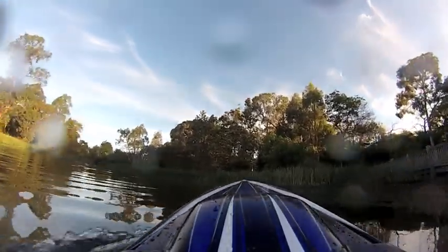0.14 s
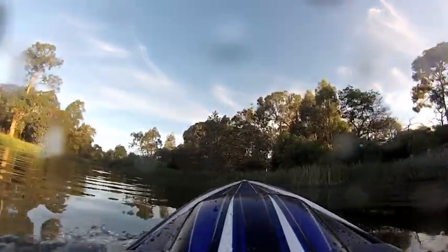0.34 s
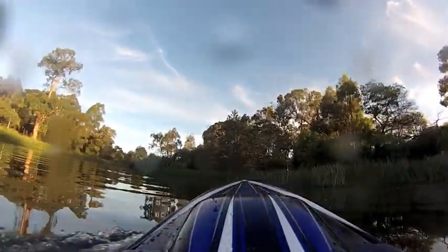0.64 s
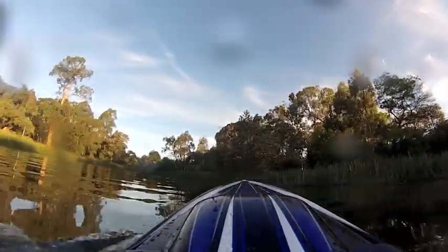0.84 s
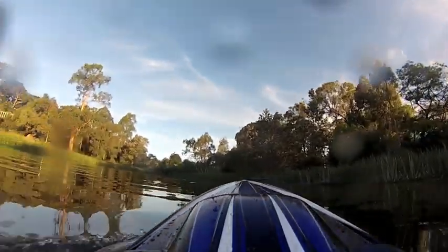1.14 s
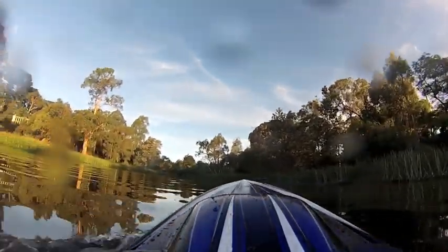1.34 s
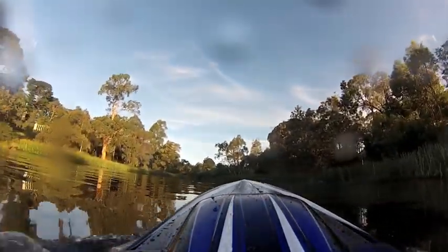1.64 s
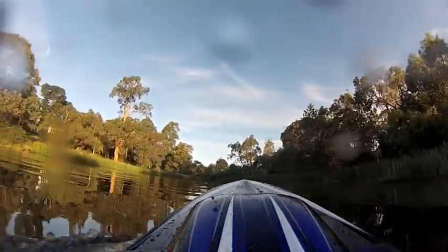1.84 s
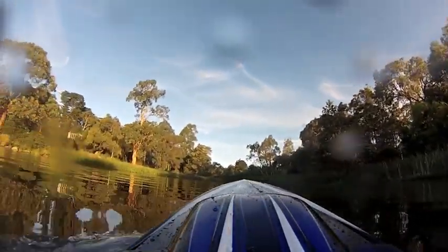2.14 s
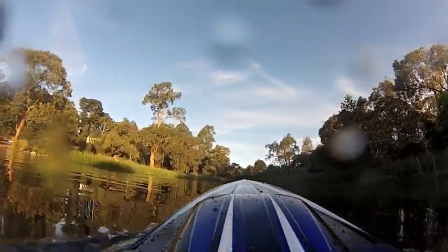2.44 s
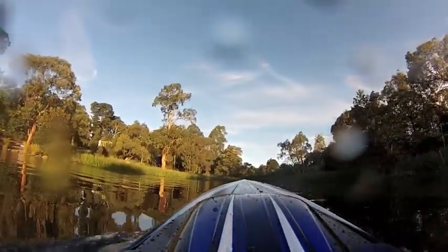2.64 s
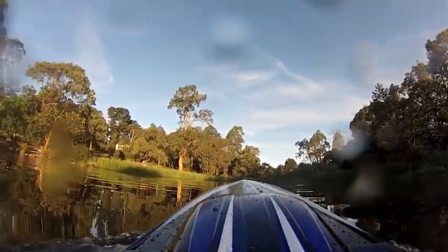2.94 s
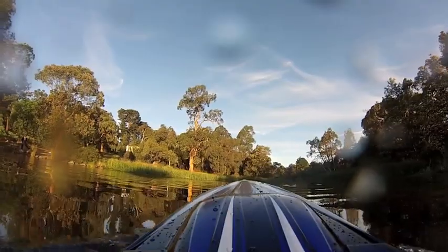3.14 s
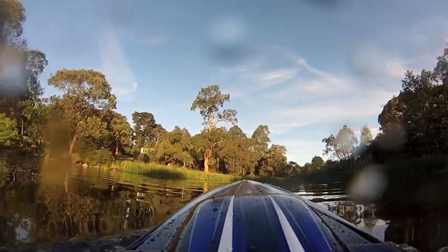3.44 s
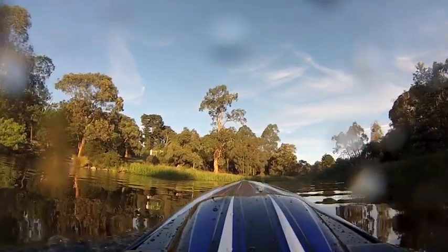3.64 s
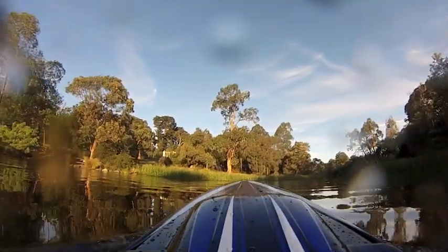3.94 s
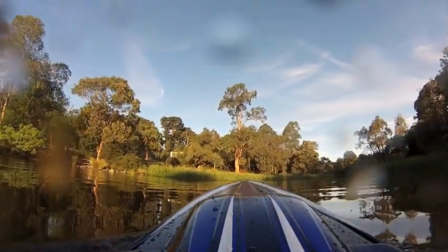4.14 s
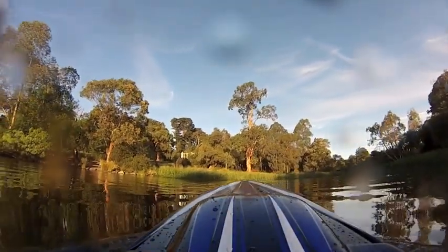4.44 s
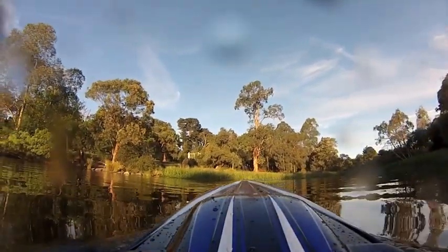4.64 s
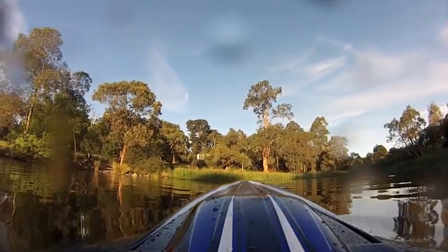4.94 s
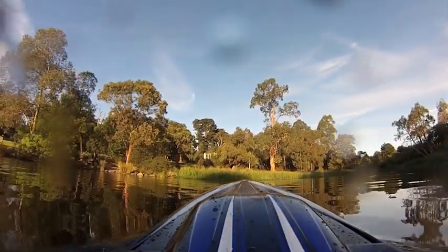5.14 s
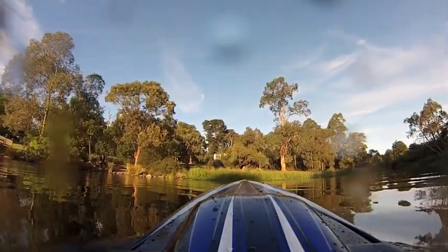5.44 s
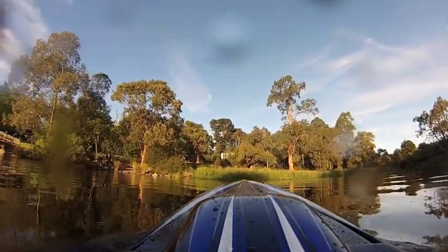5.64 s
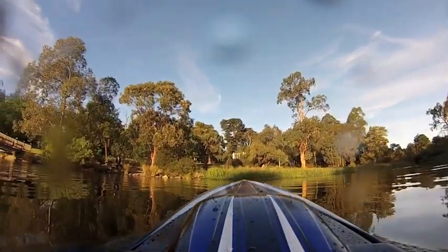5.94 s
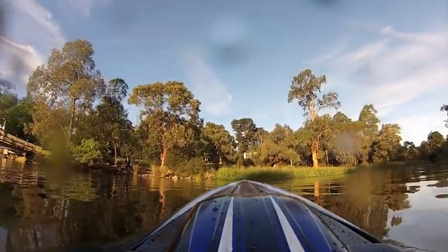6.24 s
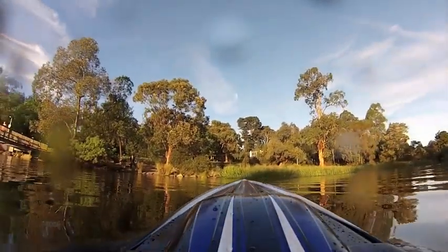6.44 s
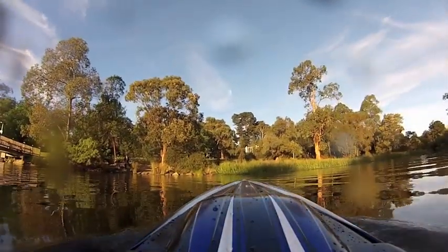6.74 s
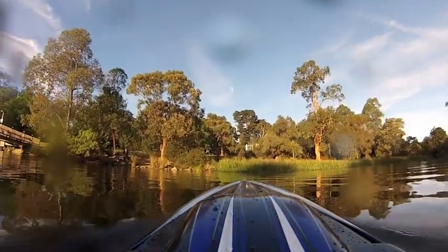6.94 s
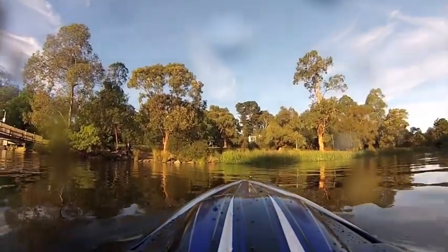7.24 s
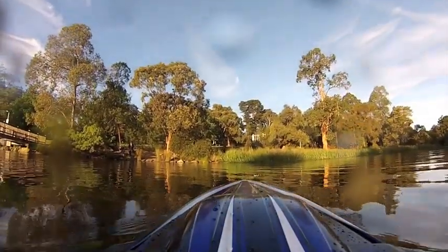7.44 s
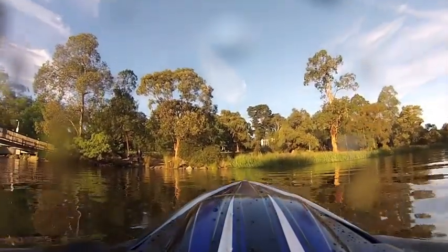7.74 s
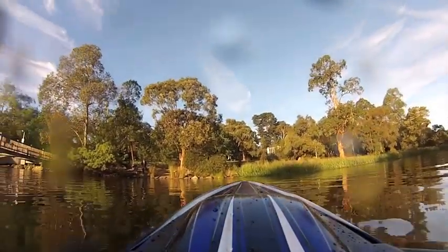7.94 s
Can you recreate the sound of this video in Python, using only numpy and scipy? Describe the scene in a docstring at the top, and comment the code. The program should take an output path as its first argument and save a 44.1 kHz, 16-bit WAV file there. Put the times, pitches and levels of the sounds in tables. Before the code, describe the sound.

Heard from on board, a model boat's whining motor gradually slows, stops briefly amid soft gurgling water, then slaps the water and races.

```python
"""On a lake, on the deck of an electric model boat, heard from a camera that rides on it.
The propeller drones through the hollow hull while the drive shaft rattles and water rushes and sprays.
The throttle closes: the boat coasts among lapping wavelets and plopping bubbles, and the motor blips.
Then it restarts with a thin whine and a slap of water; the propeller bites, draws air and races."""
import sys
import numpy as np
from scipy import signal
from scipy.fft import rfft, irfft
from scipy.io import wavfile

SR = 44100
rng = np.random.default_rng(int(sys.argv[2]) if len(sys.argv) > 2 else 0)


def pcm_store(signal):
    """Save signal as 16-bit PCM."""
    levels = np.round(np.clip(np.atleast_2d(signal), -1, 1) * 32767)
    wavfile.write(sys.argv[1], SR, levels.astype(np.int16).T)


N = 356769
T = np.arange(N) / SR
CLOSE_S, OPEN_S, RUNDOWN_S = 6.3, 7.752, 0.34  # throttle shut, throttle open, length of the run-down
CRUISE_HZ, FULL_HZ, IDLE_HZ = 128, 177, 112  # blade rates


def drive():
    """The boat under power: propeller tones, rattle and water, all riding on one turning shaft."""
    blade_hz = blade_rate()
    turn = angle(blade_hz * (1 + 0.001975 * wander(14.37)))
    slip_db, *water_churn_db = churn()
    rush_db, clatter_db, spray_db, boom_db = water_levels(blade_hz, *water_churn_db)
    propeller = drone(turn, blade_hz, slip_db) + whine(turn, blade_hz, rush_db)
    return propeller + water(turn, blade_hz, rush_db, clatter_db, spray_db, boom_db)


# How loud the hull makes a propeller tone at each pitch: (pitch [Hz], level [dB])
DRONE_RESPONSE = [(115, -37), (136, -39.5), (155, -30), (170, -23.5), (184, -16.5), (203, -22), (230, -18),
                  (252, -14), (272, -13.5), (302, -23), (335, -28), (370, -37.5), (405, -32.5)]
def drone(turn, blade_hz, slip_db):
    """Blade tone and octave waver as the blades bite; pulling away, the tone swells and the octave dips."""
    tone_hz, tone_db = np.transpose(DRONE_RESPONSE)
    grip_db = slip_db + throttle(fall_db=54, hang=0.84, lag_s=0.017)
    pull = arch(7.85, width_s=0.11)
    blade_db = np.interp(blade_hz, tone_hz, tone_db) + grip_db + 17.5 * pull
    octave_db = np.interp(2 * blade_hz, tone_hz, tone_db) + grip_db - 9 * pull ** 2
    blade = gain_of(blade_db + 0.38 * wander(34)) * np.sin(turn + 0.085 * wander(30))
    octave = gain_of(octave_db + 0.72 * wander(16)) * np.sin(2 * turn + 0.08 * wander(30))
    return np.sqrt(2) * (blade + octave)


# Drive overtones before the hull colours them: (pitch [x blade rate], level [dB])
OVERTONES = [(.5, -5.5), (1.5, -6.5), (2.5, -11), (3, 2), (4, 2), (5, -2.5), (6, -2), (7, -9.5), (8, -4),
             (11, 2), (12, 1)]
# Bearing whine between the harmonics: (pitch [x blade rate], level [dB])
BEARINGS = [(8.78, 2), (9.27, -3)]
# The whine stands out of the rush most at full speed: (blade rate [Hz], trim [dB])
WHINE_TRIM = [(130, 1.5), (165, -2), (180, 2.5)]
def whine(turn, blade_hz, rush_db):
    """Drive and bearing overtones swell as they sweep across the hull's resonances."""
    response = hull_gain(np.arange(SR // 8))
    partials = np.zeros(N)
    for multiple, db in OVERTONES + BEARINGS:
        resonance = np.interp(multiple * blade_hz, np.arange(len(response)), response)
        phase = multiple * turn + 2 * np.pi * rng.random() + 0.45 * wander(11)
        partials += gain_of(db) * resonance * np.sin(phase)
    trim_db = np.interp(blade_hz, *np.transpose(WHINE_TRIM))
    return np.sqrt(2) * gain_of(rush_db + trim_db + wander(12)) * partials


# The run, sagging as the boat digs into its turn: (time [s], blade rate [Hz])
RUN_SPEED = [(0.0, 199.8), (0.4, 203.2), (0.56, 177.1), (0.9, 187.7), (1.38, 186.7), (2.23, 177.3),
             (2.4, 166.5), (2.65, 169.5), (2.78, 158.3), (3.17, 152.5), (3.34, 141.1), (3.72, 140.5),
             (3.8, 132.9), (4.22, 129.5), (4.3, 122.8), (4.66, 116.2), (4.73, 132.2), (5.16, 136.4),
             (5.53, 134.2), (5.81, 125.4), (6.15, 123.8), (6.22, 136.1)]
# The restart, where the propeller bites, draws air and races: (time [s], blade rate [Hz])
LAUNCH_SPEED = [(7.76, 125.9), (7.83, 139.2), (7.945, 131), (7.97, 182.7), (8.0, 204.2), (8.025, 247.7),
                (8.05, 239.4), (8.08, 202.6)]
def blade_rate(sag_hz_per_s=250):
    """The drive's pitch curve in Hz: the run, a dive as the throttle closes, then the launch."""
    run_hz, = curves(RUN_SPEED)
    launch_hz, = curves(LAUNCH_SPEED)
    sag_hz = sag_hz_per_s * np.maximum(T - CLOSE_S, 0)
    return run_then_launch(np.maximum(run_hz - sag_hz, IDLE_HZ), launch_hz)


def throttle(fall_db, hang=1, lag_s=0, pickup_db_per_s=430):
    """Fader in dB: down fall_db after RUNDOWN_S (hang > 1 holds on longer), quickly up for the restart."""
    closing = fall_db * (np.maximum(T - CLOSE_S, 0) / RUNDOWN_S) ** hang
    opening = pickup_db_per_s * np.maximum(OPEN_S + lag_s - T, 0)
    return -np.minimum(closing, opening)


# Level moves as the propeller churns:
# (start [s], length [s], drone [dB], rush [dB], spray [dB], boom [dB])
CHURNS = [(0, .4, -4, 1.5, 0, -1), (1.98, 0.13, -4, 0, 0, -1), (4.318, .07, -3.5, 0, -1, 1.5),
          (5.586, 0.047, -3, -0.5, 0, 0.5), (6.222, .05, -19, 2.5, 4, 2), (6.295, .04, 0, 2.5, 1.5, 5),
          (6.45, 0.127, 5, -0.5, -2.5, 6.5), (7.746, 0.019, -4, 10, -7.5, -4), (7.762, .085, 3, -2, 11, 6),
          (7.957, 0.037, -4.5, 3, 12.5, 0), (8.034, .07, -5.5, 5, 17, 2.5)]
def churn():
    """The propeller churns up air and its grip changes: four curves of brief dips and surges in dB."""
    return sum(np.outer(changes_db, during(s, s + length_s, fade_s=0.016))
               for s, length_s, *changes_db in CHURNS)


# Water and rattle on the run: (time [s], flow level [dB], clatter offset [dB], spray offset [dB])
WATER_MIX = [(0.02, -22, -8.5, -21.5), (0.09, -24, -6, -23), (0.24, -25.5, -7.5, -22),
             (0.58, -25.5, -4, -21), (2.08, -24, -6.5, -21), (2.64, -24.5, -6, -20),
             (3.64, -26.5, -5.5, -18.5), (3.83, -28, -4.5, -21.5), (3.96, -27, -6, -19),
             (4.48, -29.5, -4, -25), (4.6, -26.5, -6, -28), (4.76, -30.5, -6, -20.5), (6.18, -28, -5, -22)]
def water_levels(blade_hz, surge_db, spit_db, thump_db):
    """Four faders follow the flow past the hull, which grows with the blade rate on the launch."""
    run_db, run_clatter_db, run_spray_db = curves(WATER_MIX)
    launch_db = -34.5 + 5.5 * np.log2(blade_hz / CRUISE_HZ)
    flow_db = run_then_launch(run_db, launch_db) + surge_db
    rush_db = flow_db + throttle(fall_db=33)
    clatter_db = flow_db + run_then_launch(run_clatter_db, -8.5) + throttle(fall_db=36)
    spray_db = flow_db + run_then_launch(run_spray_db, -31.5) + spit_db + throttle(fall_db=65)
    boom_db = flow_db + run_then_launch(2, 4) + thump_db + throttle(fall_db=23, hang=2.85)
    return rush_db, clatter_db, spray_db, boom_db


def water(turn, blade_hz, rush_db, clatter_db, spray_db, boom_db):
    """A dense rattle pulses with shaft and blades and rings the hull in three bands, with spray on top."""
    beat = gain_of(0.77 * np.sin(turn / 2) + 1.66 * np.sin(turn) + wander(44))
    rattle = unit_rms(beat * (rng.standard_normal(N) + 0.72 * ticks(per_s=2500, spread_db=2.5)))
    body = hull(rattle + gain_of(-17) * scrape(turn))
    boom = gain_of(boom_db) * unit_rms(band(body, 85, 467))
    rush = gain_of(rush_db - 2.5) * unit_rms(band(body, 445, 1380))
    clatter = gain_of(clatter_db) * unit_rms(band(body, 1572, 3795))
    return boom + rush + clatter + spray(rattle, blade_hz, spray_db)


def scrape(turn):
    """The shaft rubs the same rough spots on every revolution, slipping a little: a fine buzz."""
    shaft = turn / 2 + .012 * wander(25)
    return unit_rms(sum(np.sin(k * shaft + 2 * np.pi * rng.random()) for k in range(14, 60)))


def spray(rattle, blade_hz, spray_db):
    """Droplets patter on the case, in rougher spurts at low speed and on the launch."""
    uneven_db = run_then_launch(np.interp(blade_hz, [CRUISE_HZ, FULL_HZ], [3.5, 1]), 3.5)
    coarse = spatter(rattle, 0.84 * uneven_db, 4080, 6040) + spatter(rattle, uneven_db, 6080, 8170)
    mist = spatter(rattle, uneven_db, 8580, 15000)
    mist_db = 1 + .35 * (spray_db + 47)  # heavier spray throws more fine mist
    return gain_of(spray_db) * unit_rms(coarse + gain_of(mist_db) * mist)


def spatter(rattle, uneven_db, lo_hz, hi_hz):
    """Spray of one droplet size, arriving in spurts a few milliseconds long."""
    spurts = unit_rms(gain_of(uneven_db * (.95 * wander(130) + .35 * wander(20))))
    drops = 0.18 * uneven_db * ticks(per_s=360, spread_db=7.0)
    return band(hull(spurts * rattle + drops), lo_hz, hi_hz)


# Resonances of the hull and camera case: (centre [Hz], width [Hz], level [dB])
HULL_MODES = [(125.6, 21, -10.5), (182.8, 12.8, -1.5), (258.3, 26, 1.5), (396.3, 62, -10.5), (454, 14, -18),
              (599, 120, -19), (701.4, 62, -12.5), (839.6, 52, -10.5), (1167, 205, -14), (1306, 88, -15),
              (1422, 42, -20.5), (1676, 120, -27.5), (1931, 72, -22), (2150, 116, -22), (2355, 100, -20),
              (2843, 294, -27), (3016, 66, -28), (3534, 193, -24), (3940, 130, -33.5), (4764, 220, -35.5),
              (5350, 410, -34.5), (6780, 570, -43), (7700, 1700, -53), (11200, 1038, -53),
              (13671, 707, -60)]
def hull_gain(hz):
    """The hollow hull's tone colour: how strongly it passes each frequency."""
    return np.sqrt(sum(gain_of(db) ** 2 / (1 + ((hz - centre) / width) ** 2) ** 2
                       for centre, width, db in HULL_MODES))


def hull(x, size=8192):
    """Rings a sound through the hull's minimum-phase response."""
    log_gain = np.log(hull_gain(abs(np.fft.fftfreq(size, 1 / SR))) + 1e-6)
    spectrum = np.exp(np.conj(signal.hilbert(log_gain)))
    ring = np.fft.ifft(spectrum).real[:size // 2]
    return signal.oaconvolve(x, ring)[:len(x)]


# Water hits: (time [s], smack peak [dB], decay t60 [s], spray offset [dB])
SLAPS = [(.833, -18.5, 0.026, -15), (7.161, -35, 0.0093, -0.5), (7.708, -32.5, 0.063, -26),
         (7.751, -13.5, 0.051, -31), (7.763, -22.5, 0.076, -11), (7.881, -32, 0.045, -30),
         (7.957, -20.5, 0.025, -8.5)]
def slaps(size=9000):
    """Water smacks the deck panel and throws a bright burst of spray."""
    out, t = np.zeros(N), np.arange(size) / SR
    for s, db, t60, spray_db in SLAPS:
        burst = hull(rng.standard_normal(size) * gain_of(-60 * t / t60))
        smack = unit_peak(band(burst, 1090, 1200))
        splash = unit_peak(band(burst, 4500, 15000))
        add(out, s, gain_of(db) * (smack + gain_of(spray_db) * splash))
    return out


# Throttle blips: (time [s], sweep half-length [s], top pitch [Hz], squeal level [dB], hum level [dB])
BLIPS = [(6.486, 0.024, 2780, -18, -29), (6.881, .036, 2620, -14, -31)]
def blip(s, width_s, top_hz, squeal_db, hum_db, rest_hz=1990):
    """The drive squeals up and down again, chattering against the hull and setting it humming."""
    hz = rest_hz + (top_hz - rest_hz) * arch(s, width_s)
    turn = angle(hz * (1 + 0.054 * wander(384)))
    squeal = np.sin(turn) + 0.085 * np.sin(2 * turn)
    hum = np.sin(2 * np.pi * 272 * T)
    rasp = unit_rms(band(hull(rng.standard_normal(N)), 1380, 8000))
    chatter = gain_of(squeal_db + 2.4 * hum) * hull_gain(hz)
    squeal_fade = arch(s - 0.0086, width_s=0.04)  # peaks on the way up
    hum_fade = arch(s + 0.016, width_s=0.027)  # the hull lags behind
    return chatter * squeal_fade * (squeal + 0.5 * rasp) + np.sqrt(2) * gain_of(hum_db) * hum_fade * hum


# The speed controller's whine before the motor turns: (time [s], level [dB])
STARTER_FADE = [(7.52, -80), (7.55, -60), (7.675, -66), (7.688, -52), (7.735, -41), (7.755, -59)]
# Its partials: (pitch [Hz], level [dB])
STARTER_PARTIALS = [(1710, -11), (3420, -5), (5130, -19), (6840, -27)]
def starter():
    """A thin, rough whine from the windings of the stalled motor."""
    level_db, = curves(STARTER_FADE)
    clock = angle(1 + 0.0194 * wander(266))
    tone = unit_rms(sum(gain_of(db) * np.sin(hz * clock) for hz, db in STARTER_PARTIALS))
    gate = during(STARTER_FADE[0][0], STARTER_FADE[-1][0])
    return gate * gain_of(level_db + 2 * wander(150)) * tone


# Plops while coasting: (time [s], level [dB], starting pitch [Hz], ring t60 [s], splash offset [dB])
PLOPS = [(6.664, -43, 1757, .04, 0), (6.961, -27.5, 786, 0.079, -12), (7.013, -35, 1090, 0.044, -10),
         (7.03, -30, 1320, 0.04, -3), (7.054, -34, 1310, 0.036, 2), (7.097, -24, 2070, 0.035, -17),
         (7.117, -30, 1200, .05, -10), (7.139, -29, 2040, .03, 4.5), (7.162, -23, 790, 0.066, -5),
         (7.166, -25, 1145, 0.043, -15), (7.22, -42, 900, .04, -7), (7.243, -29.5, 1090, .04, 0),
         (7.273, -33, 1330, 0.066, -15), (7.307, -39, 1130, .06, -13), (7.362, -36, 383, 0.16, -15)]
def plops(size=8000):
    """Each is a small splash on the hull and a bubble whose pitch rises as it rings."""
    out, t = np.zeros(N), np.arange(size) / SR
    for s, db, hz, t60, splash_db in PLOPS:
        envelope = gain_of(-60 * t / t60) * (1 - np.exp(-t / 0.00055))
        bubble = envelope * np.sin(angle(hz * (1 + 4 * t)))
        burst = rng.standard_normal(size) * gain_of(-60 * t / 0.023)
        splash = unit_peak(band(hull(burst), 380, 12000))
        add(out, s, gain_of(db - 4.5) * (bubble + gain_of(splash_db) * splash))
    return out


# Wavelets meeting the hull: (time [s], level [dB], treble offset [dB], rise [s], fall [s])
WAVELETS = [(6.5, -51, 6, .035, .025), (6.6, -49, -3, .05, 0.024), (6.8, -58.5, 9, 0.055, 0.21),
            (7.06, -46.5, 3.5, 0.068, 0.14), (7.172, -31.5, -20, .008, 0.014),
            (7.245, -43, -12, 0.029, 0.063)]
def lapping(calm_db=-61.5):
    """Water laps the coasting boat: a gurgling wash that swells with each wavelet and booms in the hull."""
    calm = gain_of(calm_db) ** 2
    body = sum(swell(s, db, rise, fall) for s, db, _, rise, fall in WAVELETS)
    treble = sum(swell(s, db + bright_db, rise, fall) for s, db, bright_db, rise, fall in WAVELETS)
    body_db, treble_db = 10 * np.log10(calm + body), 10 * np.log10(calm / 2 + treble)
    texture = gurgle()
    wash = gain_of(body_db) * band(texture, 160, 1390) + gain_of(treble_db) * band(texture, 1580, 15000)
    boom = gain_of(-30.5 + 0.41 * body_db) * unit_rms(band(hull(rng.standard_normal(N)), 99, 243))
    return during(6.4, 7.69) * (wash + boom)


# EQ of the lapping: (frequency [Hz], gain [dB])
LAP_EQ = [(200, 0), (400, 0), (800, 2), (1250, -1.5), (1650, -8), (2150, -6.5), (3000, -12), (4300, -21.5),
          (5500, -20), (8000, -36), (14000, -36)]
def gurgle():
    """Small bubbles of many sizes ring for a few cycles each over a bed of soft noise."""
    bubbles, t = np.zeros(N), np.arange(3000) / SR
    for hz in np.geomspace(300, 9000, 48):
        ring = np.sin(angle(hz * (1 + 3 * t))) * np.exp(-t * hz / 3.5) * (1 - np.exp(-t * hz))
        bubbles += np.sqrt(hz) * unit_rms(signal.oaconvolve(ticks(per_s=45, spread_db=1.5), ring)[:N])
    froth = unit_rms(bubbles) + 0.83 * rng.standard_normal(N)
    eq_hz, eq_db = np.transpose(LAP_EQ)
    colour_db = np.interp(np.log(np.fft.rfftfreq(N, 1 / SR) + 1), np.log(eq_hz), eq_db)
    return unit_rms(irfft(rfft(froth) * gain_of(colour_db), N))


# Jolts to the camera mount: (time [s], level [dB], rise [s], fall [s])
JOLTS = [(6.64, -30, 0.21, 0.1), (7.25, -32, 0.31, 0.21), (7.755, -13, 0.018, 0.064),
         (7.95, -22, 0.077, 0.043), (8.08, -16, 0.017, .05)]
def mount(sway_db=-44, rock_hz=21.7):
    """The camera rocks on its mount, harder at a jolt; under power it wobbles and rumbles more."""
    powered = 1 - during(CLOSE_S + RUNDOWN_S, OPEN_S - .07)
    level = np.sqrt(gain_of(sway_db) ** 2 + sum(swell(*jolt) for jolt in JOLTS))
    rocking = np.sqrt(2) * np.sin(angle(rock_hz + 2 * powered * wander(8.2)))
    rumble = unit_rms(band(np.cumsum(rng.standard_normal(N)), 22, 96))
    return level * (rocking + gain_of(-18 + 10 * powered) * rumble)


def gain_of(db):
    """Decibels to amplitude."""
    return 10 ** (np.asarray(db) / 20)


def unit_rms(x):
    """Normalises to rms 1."""
    return x / np.sqrt(np.mean(x ** 2) + 1e-20)


def unit_peak(x):
    """Normalises to peak 1."""
    return x / abs(x).max()


def curves(rows):
    """One automation curve for each column after the time."""
    s, *columns = np.transpose(rows)
    return [np.interp(T, s, column) for column in columns]


def run_then_launch(run, launch):
    """Switches from the run's setting to the restart's midway through the coast."""
    return np.where(T < (CLOSE_S + OPEN_S) / 2, run, launch)


def during(start_s, end_s, fade_s=.02):
    """A gate: 1 between two times, fading to 0 outside them."""
    return np.clip(1 + np.minimum(T - start_s, end_s - T) / fade_s, 0, 1)


def arch(s, width_s):
    """A smooth hump of height 1 around time s."""
    return np.exp(-((T - s) / width_s) ** 2)


def swell(s, db, rise_s, fall_s):
    """A power envelope that grows until time s and then dies away."""
    return gain_of(db) ** 2 * np.exp(-2 * np.maximum((s - T) / rise_s, (T - s) / fall_s))


def add(mix, s, sound):
    """Mixes a sound in at time s."""
    part = mix[round(s * SR):][:len(sound)]
    part += sound[:len(part)]


def band(x, lo_hz, hi_hz):
    """Steep band-pass."""
    return signal.sosfilt(signal.butter(4, [lo_hz, hi_hz], "band", fs=SR, output="sos"), x)


def wander(rate_hz):
    """Smooth random modulation of rms 1, up to about this rate."""
    hz = np.fft.rfftfreq(N, 1 / SR)
    return unit_rms(irfft(rfft(rng.standard_normal(N)) / (1 + (hz / rate_hz) ** 4), N))


def angle(hz):
    """Phase of something that turns at a changing rate."""
    return 2 * np.pi * np.cumsum(hz) / SR


def ticks(per_s, spread_db):
    """Random impacts: many small, a few large."""
    size = gain_of(spread_db * np.minimum(rng.exponential(1, N), 5))
    return unit_rms(size * rng.choice([-1, 1], N) * (rng.random(N) < per_s / SR))


def scene():
    """The mono mix on deck: drive, coasting sounds, slaps, the rocking mount and a faint hiss."""
    coasting = lapping() + plops() + sum(blip(*row) for row in BLIPS) + starter()
    hiss = gain_of(-70) * rng.standard_normal(N)
    return (drive() + coasting + slaps() + mount() + hiss)[None]


def record(dry):
    """A steep high cut at 15 kHz, the camera's band limit."""
    high_cut = signal.firwin(511, 15000, window=("kaiser", 9), fs=SR)
    return signal.oaconvolve(dry, high_cut[None], "same")


dry = scene()
out = record(dry)
pcm_store(out)
```